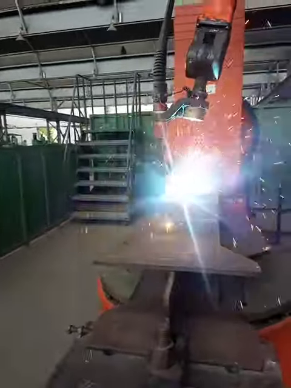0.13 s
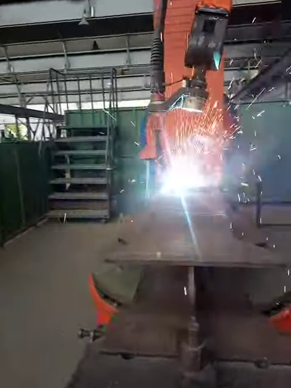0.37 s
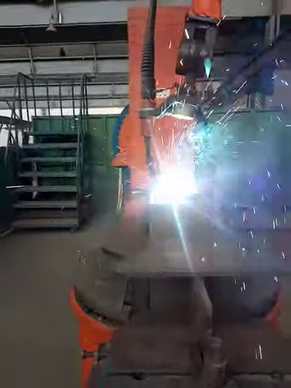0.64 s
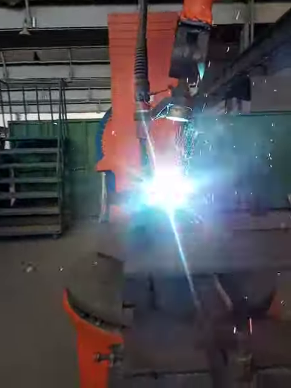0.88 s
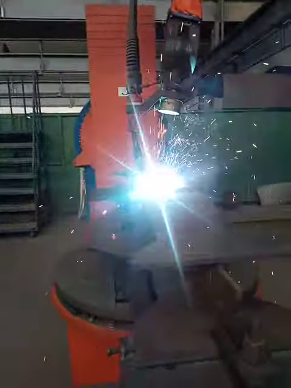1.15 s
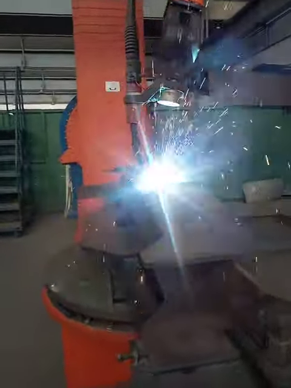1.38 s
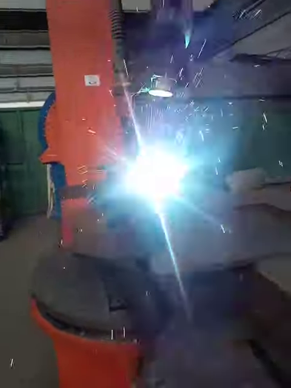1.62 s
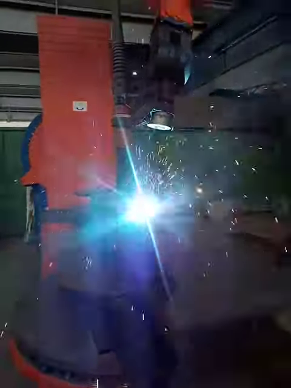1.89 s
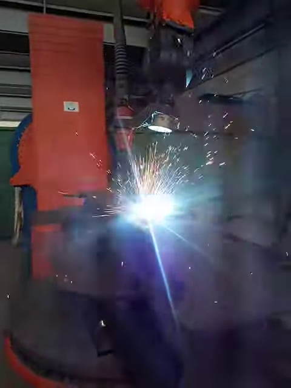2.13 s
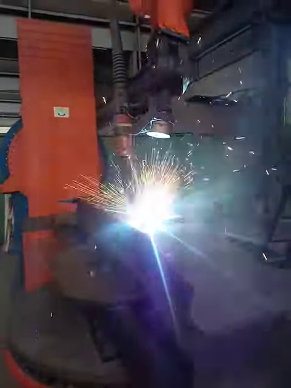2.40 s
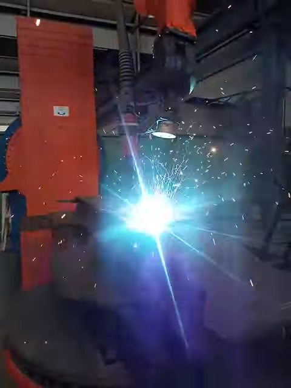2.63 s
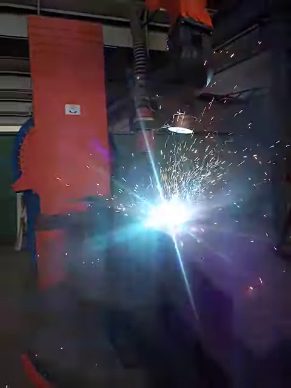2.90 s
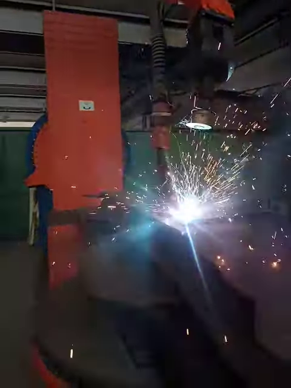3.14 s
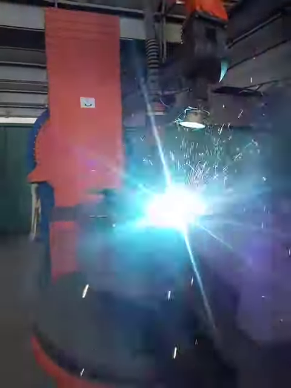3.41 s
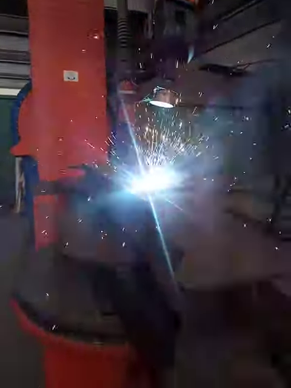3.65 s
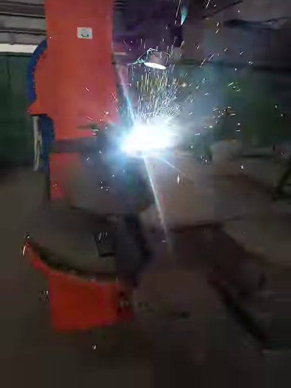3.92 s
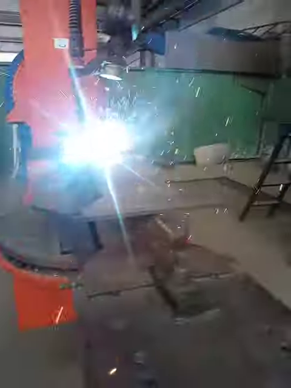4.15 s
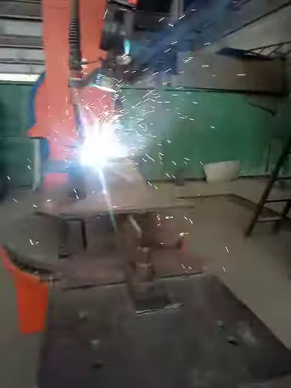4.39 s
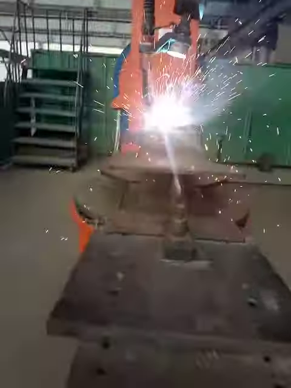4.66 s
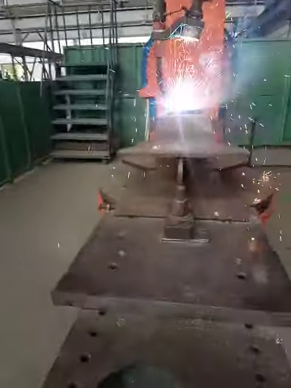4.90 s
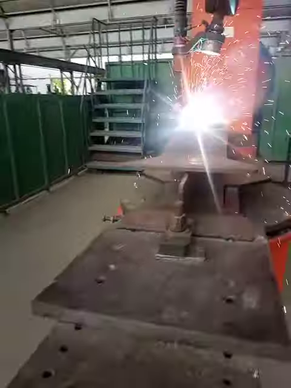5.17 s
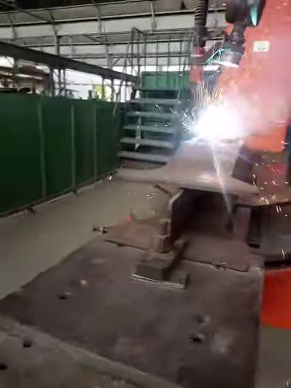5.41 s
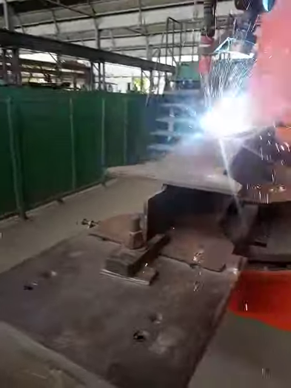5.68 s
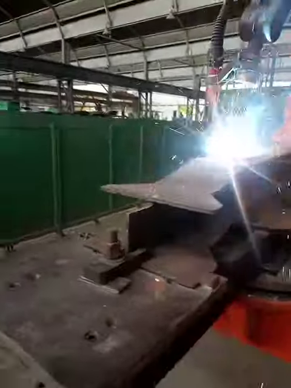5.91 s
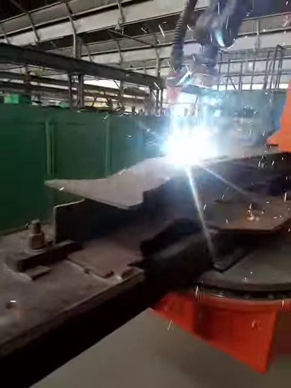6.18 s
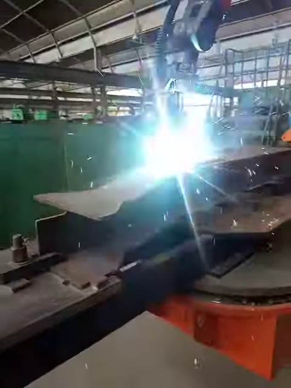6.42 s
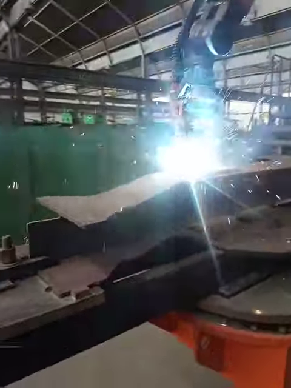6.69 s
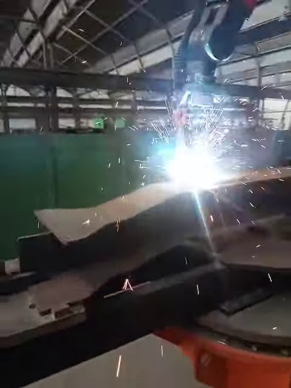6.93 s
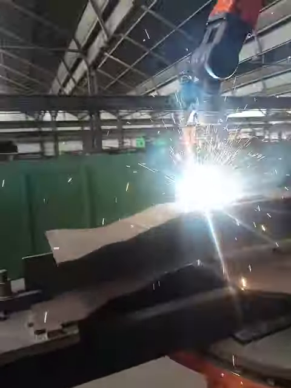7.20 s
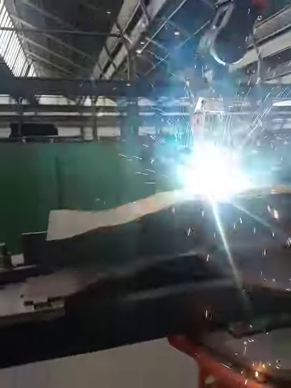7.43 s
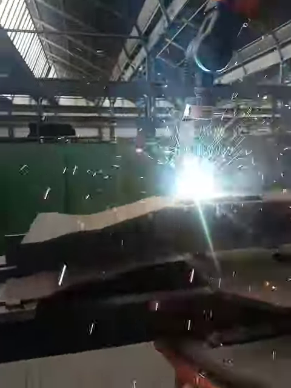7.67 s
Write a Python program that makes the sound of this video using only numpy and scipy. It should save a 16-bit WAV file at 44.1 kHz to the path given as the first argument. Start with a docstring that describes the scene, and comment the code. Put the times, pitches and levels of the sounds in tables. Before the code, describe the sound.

A wire-fed welding torch burns continuously on steel in a factory hall, heard through a handheld microphone moving around the work. From 0 s a bright, gritty hiss throbs very rapidly at about 250 pulses a second, with crisp irregular snaps roughly ten to twenty times a second. A faint buzzing hum and thin whine lie beneath, over low, soft machinery roar. From about 1.2 s the arc and hum gradually weaken, quietest around 2.2-3.5 s, where small dull microphone knocks accompany some crackles. Near 3.9-4.1 s it surges back, fuller and harsher, with louder pops. Between 4 and 6.8 s it is strongest, the hum and hall roar swelling around 5-6 s, with shifting metallic, hollow resonances and short reverberation. After 7 s it thins and falters, with one last knock near 7.7 s; the weld is still crackling when it stops at about 7.8 s.

```python
"""Pulsed-arc welding in a factory hall

A wire-fed torch welds steel while the listener walks round the work. Each current pulse modulates the arc:
harmonic tones give the hum, noise and random puffs the throbbing hiss, sharper puffs the snaps of droplets
that short the arc. Echoes, resonances and a diffuse tail place it in the hall, over a roar of filtered noise.
Now and then high-passed pressure steps give the hand-held microphone a dull knock."""
import sys
import numpy as np
from scipy import signal
from scipy.fft import rfft, irfft, next_fast_len
from scipy.io import wavfile
from scipy.ndimage import uniform_filter1d, map_coordinates

SR = 44100
rng = np.random.default_rng(int(sys.argv[2]) if len(sys.argv) > 2 else 0)


def to_wav(sig):
    """Store sig (one row per channel, or 1-D mono) as 16-bit WAV at the path in sys.argv[1].

    Samples outside -1..1 are clipped; the rate is SR.
    """
    pcm = np.clip(np.atleast_2d(sig), -1, 1) * 32767
    pcm = np.round(pcm).astype(np.int16)
    wavfile.write(sys.argv[1], SR, pcm.T)  # frames by channels


def invert_db(x):
    """Field ratio 10**(x/20) for x, a level in decibels (scalar or array-like)."""
    u = np.asarray(x, float) / 20
    return 10 ** u


N = 344421
PULSE_HZ = 248.05  # rate of the current pulses

# Pressure jolts on the microphone, each arriving with a short circuit: time_s, step_db
KNOCKS = [(2.275, -26.5), (2.3632, -29), (2.3703, -18.5), (2.4403, -20.5), (2.7588, -32), (2.7671, -30.5),
          (2.84, -30), (2.893, -19.5), (3.0732, -28.5), (3.1259, -19.5), (3.1704, -25.5), (3.3234, -23.5),
          (3.3803, -25), (3.445, -31.5), (3.5528, -24), (7.7152, -18.5)]


def rms_one(x):
    """Normalisation: scales the root mean square to 1."""
    return x / np.sqrt(np.mean(x ** 2) + 1e-20)


def in_time(rows):
    """Linear interpolation of each column over the scene; the first column is time in seconds."""
    s, *columns = np.transpose(rows)
    return [np.interp(np.arange(N) / SR, s, column) for column in columns]


def drift(rate_hz):
    """Low-pass random process of rms 1: noise twice through a one-pole filter."""
    r = np.exp(-2 * np.pi * rate_hz / SR)
    noise = rng.standard_normal(N + SR)
    settled = signal.lfilter([1], [1, -2 * r, r * r], noise)[SR:]
    return rms_one(settled)


def response(spectrum, size=4096):
    """Minimum phase: folding the cepstrum gives the most compact causal impulse response of a spectrum."""
    hz, db = np.transpose(spectrum)
    grid = np.maximum(np.arange(size // 2 + 1), 1) * SR / size
    gain = invert_db(np.interp(np.log(grid), np.log(hz), db))
    cepstrum = irfft(np.log(gain))
    cepstrum[1:size // 2] *= 2
    cepstrum[size // 2 + 1:] = 0
    return irfft(np.exp(rfft(cepstrum)))


def through(x, impulse):
    """Linear filtering: convolution with an impulse response."""
    return signal.fftconvolve(x, impulse)[:N]


def dying(t60_s):
    """Exponential decay from height 1 by 60 dB."""
    return invert_db(-60 * np.arange(round(t60_s * SR)) / (t60_s * SR))


def evened(x):
    """Slow gain control: divides by the running rms, the power averaged twice over a third of a second."""
    power = uniform_filter1d(uniform_filter1d(x ** 2, size=SR // 3), size=SR // 3)
    return x / np.sqrt(power + 1e-20)


def roar(hall_db):
    """Incoherent addition: far machines and extraction fans blend into low, filtered noise."""
    # Spectral shape of the hall machinery: frequency_hz, relative_db
    spectrum = [(25, -28), (50, -24), (90, 6.5), (180, 13), (300, 13), (420, 0.5), (700, 8.5), (1200, -0.5),
                (2500, -55.5)]
    wash = rms_one(through(rng.standard_normal(N), response(spectrum)))
    return invert_db(hall_db + 2.0 * drift(20.0)) * wash


def knocks(rise_hz=4000, cut_hz=85):
    """Step response: the microphone's bass cut turns a pressure step into a spike, a rebound and a dip."""
    jolts = np.full(N, 1e-18)  # a tiny floor against underflow in the filters
    for s, db in KNOCKS:
        jolts[round(s * SR) - 6] = -invert_db(db)
    steps = np.cumsum(jolts)
    soft = signal.sosfilt(signal.butter(2, rise_hz, fs=SR, output="sos"), steps)
    return signal.sosfilt(signal.butter(4, cut_hz, "high", fs=SR, output="sos"), soft)


def hum_db():
    """Interference: direct sound and reflection add or cancel, differently for each harmonic."""
    # Reflection met on the walk: time_s, extra_path_m, direct_hum_db
    wall = [(0.0, 0.28, -49), (0.15, 0.27, -47.5), (0.5, 0.3, -51.5), (0.8, 0.43, -53.5),
            (1.05, 0.5, -52.5), (1.3, 0.51, -56.0), (1.7, 0.14, -59.0), (2.2, 0.18, -59.5),
            (2.8, 0.17, -61.0), (3.3, 0.18, -61.5), (3.7, 0.2, -59), (3.95, 0.41, -55), (4.2, 0.41, -51.5),
            (4.5, 0.38, -55), (4.7, 0.38, -49.5), (5.2, 0.4, -47.0), (5.6, 0.34, -46.5), (6.0, 0.34, -48.0),
            (6.4, 0.31, -48.0), (6.8, 0.31, -50.5), (7.1, 0.32, -53.5), (7.5, 0.33, -51.5),
            (7.81, 0.31, -55.0)]
    # Harmonics 1, 2, 3 of the pulse rate against the direct hum: level_db
    harmonics = [1, 0.5, -2]
    reflected_share, sound_m_per_s = .7, 343
    path_m, direct_db = in_time(wall)
    turns = path_m * PULSE_HZ / sound_m_per_s  # extra path in wavelengths of the first harmonic
    levels = []
    for k, db in enumerate(harmonics, 1):
        pressure = np.abs(1 + reflected_share * np.exp(2j * np.pi * k * turns))
        levels.append(db + direct_db + 20 * np.log10(pressure))
    return levels


def tones(cycle, arc_db):
    """Periodic excitation: pulse-rate harmonics and higher tones, wavering in level and phase."""
    # Higher tones that follow the arc's strength: frequency_hz, level_against_arc_db
    whine = [(818, -30), (992, -30), (1092, -29), (1240, -26), (1488, -26), (1861.7, -24), (2120.5, -27),
             (2480.5, -27), (2728.6, -25), (2976.6, -22), (3472.7, -24)]
    low = [(k * PULSE_HZ, db) for k, db in enumerate(hum_db(), 1)]
    high = [(hz, arc_db + db) for hz, db in whine]
    out = np.zeros(N)
    for hz, db in low + high:
        ratio = hz / PULSE_HZ
        level = np.sqrt(2) * invert_db(db + 3.9 * drift(8.8))
        phase = 2 * np.pi * cycle * ratio + 0.24 * ratio * drift(0.381) + 6 * rng.random()
        out += level * np.sin(phase)
    return out


def puff(clicks, spit_share, thin_hz=1100, soft_hz=9000):
    """All-pass dispersion: a push of air swings out and back, trailed by a short spit of decaying noise."""
    swing_hz, swing_width_hz, spit_t60_s = 4500, 3300, .007
    r, w = np.exp(-np.pi * swing_width_hz / SR), 2 * np.pi * swing_hz / SR
    a = [1, -2 * r * np.cos(w), r * r]
    swing = signal.lfilter(a[::-1], a, clicks)
    spit = spit_share * through(clicks, dying(spit_t60_s)) * rng.standard_normal(N)
    band = signal.butter(1, [thin_hz, soft_hz], "band", fs=SR, output="sos")
    return signal.sosfilt(band, swing + spit)


def snaps(arc_db):
    """Impulsive sources: the loud short circuits as clicks, sized against the arc's strength at that moment."""
    # The loudest short circuits: time_s, peak_db
    loud_shorts = [(0.0204, -12), (0.0488, -11), (0.158, -11), (0.2458, -12), (0.2897, -13), (0.3147, -10),
                   (0.3346, -13), (0.3441, -13), (0.3835, -11), (0.411, -9), (0.4813, -11), (0.5322, -13),
                   (0.597, -11), (0.637, -14), (0.7462, -11), (0.8066, -14), (0.8545, -11), (0.9183, -15),
                   (0.9612, -15), (0.9961, -14), (1.0211, -12), (1.058, -11), (1.1653, -17), (1.1787, -8),
                   (1.2715, -16), (1.3284, -14), (1.3952, -16), (1.4277, -15), (1.492, -12), (1.5813, -13),
                   (1.6606, -15), (1.8188, -13), (1.9639, -17), (1.9924, -16), (2.0762, -16), (2.15, -15),
                   (2.2618, -14), (2.3077, -18), (2.362, -16), (2.4119, -22), (2.4309, -18), (2.5167, -14),
                   (2.5386, -17), (2.576, -16), (2.6179, -13), (2.7511, -18), (2.7576, -15), (2.8389, -16),
                   (2.8744, -14), (2.9148, -16), (2.9352, -14), (2.9956, -17), (3.028, -14), (3.1004, -16),
                   (3.1243, -16), (3.1986, -19), (3.2176, -18), (3.245, -17), (3.2894, -17), (3.3218, -14),
                   (3.4605, -15), (3.5523, -13), (3.6162, -15), (3.7434, -15), (3.7818, -14), (3.8302, -15),
                   (3.8746, -13), (3.8886, -12), (3.9489, -12), (3.9799, -10), (4.0083, -12), (4.2218, -11),
                   (4.2632, -10), (4.3121, -13), (4.3635, -10), (4.3844, -8), (4.5446, -12), (4.5865, -13),
                   (4.6279, -12), (4.8189, -12), (4.8549, -12), (4.9681, -10), (5.009, -12), (5.0345, -10),
                   (5.1267, -13), (5.3712, -11), (5.4201, -9), (5.4375, -11), (5.4655, -9), (5.6151, -10),
                   (5.6955, -12), (5.7034, -8), (5.8037, -10), (5.8287, -10), (5.908, -11), (6.0656, -12),
                   (6.0851, -13), (6.134, -13), (6.1699, -11), (6.328, -8), (6.3869, -11), (6.4173, -12),
                   (6.4363, -11), (6.4607, -13), (6.4767, -11), (6.5211, -11), (6.5635, -12), (6.5854, -14),
                   (6.6448, -13), (6.6827, -15), (6.7181, -14), (6.8119, -16), (6.9087, -11), (6.9491, -13),
                   (6.9935, -12), (7.016, -16), (7.0569, -17), (7.0843, -16), (7.1302, -16), (7.1911, -15),
                   (7.214, -14), (7.235, -12), (7.2868, -13), (7.4121, -16), (7.4604, -19), (7.4799, -16),
                   (7.5133, -15), (7.5572, -14), (7.6056, -15), (7.6585, -15), (7.7513, -20), (7.7747, -19)]
    rise_s, knock_snap_db = .0013, -17
    loss_db = 2.5  # makes up for what a peak loses in the puff and the microphone colour
    events = [(s + rise_s, db) for s, db in loud_shorts] + [(s, knock_snap_db) for s, _ in KNOCKS]
    s, peak_db = np.transpose(events)
    at = np.round(s * SR).astype(int) - 14
    out = np.zeros(N)
    out[at] = invert_db(peak_db + loss_db - arc_db[at])
    return out


def shorts(loud):
    """Extinction and re-ignition: a snap, a brief hush, then a brighter tick; gives (hush gain, ticks)."""
    hush_from_s, hush_to_s, hush_depth_db = .003, .0105, -4
    restrike_delays_s, restrike_db = (.0116, .0133), -7
    window = np.zeros(round(hush_to_s * SR))
    window[round(hush_from_s * SR):] = 1
    hushed = np.minimum(through(1.0 * (loud > 0), window), 1)
    hush = invert_db(hush_depth_db * uniform_filter1d(hushed, size=SR // 700))
    at, again = np.flatnonzero(loud), np.zeros(N + SR)
    delay = (rng.choice(restrike_delays_s, len(at)) * SR).astype(int)
    again[at + delay] = loud[at] * invert_db(restrike_db + rng.normal(0, 1.7, len(at)))
    first = puff(loud, .24, thin_hz=710, soft_hz=10900)
    second = puff(again[:N], .15, thin_hz=4000, soft_hz=18000)
    return hush, first + second


def sizzle(cycle, loud, per_s, spread_db, bed_db, throb):
    """Modulated random process: the rate of small shorts and the power of the hiss throb with the current."""
    timing = 1 + throb * (np.cos(2 * np.pi * cycle) + .8 * np.cos(4 * np.pi * cycle + 0.5))
    surge_db = -0.34 * drift(34) + 0.5294 * drift(29) + 0.9 * drift(155)  # strength wanders quickly
    born = rng.random(N) < per_s * np.clip(timing, 0, None) ** 2 / SR
    sizes = invert_db(spread_db * np.minimum(rng.exponential(1, N), 2))
    pops = puff(born * sizes, .15)
    bed = invert_db(bed_db) * np.sqrt(np.clip(timing, .05, None)) * rng.standard_normal(N)
    hush, ticks = shorts(loud)
    return rms_one(invert_db(surge_db) * hush * (bed + pops)) + ticks


def microphone_colour(x):
    """Linear frequency response: the arc's spectrum as heard through the microphone."""
    # Colour of the arc: frequency_hz, relative_db
    colour = [(25, -32), (150, -15), (400, -9), (1100, -10), (1900, -3.5), (2600, -5.5), (3400, -2),
              (4000, -2.5), (5100, 1), (5750, 0), (6150, 2), (6600, 6.5), (7400, 2), (9700, -7.5)]
    # Its continuation at the top of the treble: frequency_hz, relative_db
    top = [(13850, -13.5), (14600, -4), (15700, -3), (15900, -40)]
    return through(x, response(colour + top))


def echoes(x):
    """Comb filtering: delayed copies, dull in the treble, add a twin, the plate's echo and three weaker ones."""
    # A close twin of each pulse off the microphone's own case: time_s, share_of_direct
    twin_rows = [(0, .5), (1.5, .45), (3.5, .35), (4.2, .3), (6.5, .25), (7.81, .35)]
    # Reflection off the steel plate on the walk: time_s, lag_ms, share_of_direct
    plate = [(0, 0.99, 0.037), (.6, 1.4, 0.056), (1.3, 2.6, 0.04), (2.1, 3.4, 0.044), (3.3, 1.8, 0.0888),
             (4.2, 1.48, 0.11), (5.0, 1.14, 0.15), (5.6, 1.6, 0.041), (6.5, 1.4, 0.099), (6.9, 1.2, 0.078),
             (7.81, 1.3, 0.12)]
    twin_share, = in_time(twin_rows)
    plate_ms, plate_share = in_time(plate)
    paths = [(.222, twin_share), (plate_ms, plate_share)]
    for ms in (.8, 2.3, 3.9):  # nearby steel, its lags slowly wandering
        paths.append((ms * (1 + 0.097 * drift(0.503)), .1))
    dull = signal.sosfilt(signal.butter(2, 8500, fs=SR, output="sos"), x)
    n = np.arange(N)
    return x + sum(share * map_coordinates(dull, [n - ms * SR / 1000], order=3) for ms, share in paths)


def hollows(x):
    """Resonance: narrow bands stand out, each swelling and fading while a hollow of the work faces the listener."""
    # Resonances, the two ends of a stretch in either order: one_end_s, other_end_s, centre_hz, width_hz, share
    resonances = [(0, 3.6, 5830, 400, .5), (0, 1.3, 6650, 300, 0.59), (.75, 1.4, 5100, 300, 0.35),
                  (1.398, 2, 3430, 245, 0.35), (3.5, 3.8, 4950, 250, 0.3785), (3.7, 4.58, 5400, 250, 0.59),
                  (3.9, 9, 3480, 180, 0.6), (5.3, 5.4, 3170, 250, 0.5), (6.0, 5.98, 4300, 250, 0.53),
                  (6.45, 7.15, 4850, 294, 0.62), (5.6, 16, 6640, 350, 0.83), (6.801, 4.3, 5860, 308, 0.13),
                  (5.9, 6.655, 5250, 300, 0.55), (6.1, 6.98, 3960, 200, 0.73)]
    out, s = x.copy(), np.arange(N) / SR
    for start, end, hz, width_hz, share in resonances:
        r = np.exp(-np.pi * width_hz / SR)
        poles = [1, -2 * r * np.cos(2 * np.pi * hz / SR), r * r]
        rung = signal.lfilter([(1 - r * r) / 2, 0, (r * r - 1) / 2], poles, x)
        swell = np.sin(np.pi * np.clip((s - start) / (end - start), 0, 1))
        out += share * swell * rung
    return out


def hall(x):
    """Diffuse reverberation: a decaying, duller noise tail, a new one crossfaded in every half second."""
    t60_s, tail_db = 0.18, -8.5
    step, size = SR // 2, round(t60_s * SR)
    out = np.zeros(N + 4 * SR)
    padded = np.concatenate([np.zeros(step), x, np.zeros(2 * step)])
    for i in range(0, N + step, step):
        noise = rng.standard_normal(size)
        tail = signal.lfilter([1], [1, -.3], dying(t60_s) * noise)
        tail /= np.sqrt(np.sum(tail ** 2))
        wet = signal.fftconvolve(padded[i:i + 2 * step] * np.hanning(2 * step), tail)
        out[i:i + len(wet)] += wet
    return x + invert_db(tail_db) * out[step:step + N]


def shaded(x, arc_db, pointing_db, hall_db):
    """Band-wise modulation: soft-edged bands follow arc, pointing and hall in their own measure, and flicker."""
    # Borders between the bands: frequency_hz
    edges = [1500, 3000, 6000, 9000, 14100]
    # Bands, low to high: level_against_3_to_6_khz_db, slow_arc_share, quick_flare_share, pointing_share,
    # hall_swing_share, flicker_db (scales a sum of three drifts brought to rms 1)
    shares = [(-11.5, 0.32, 0.71, -0.048, 0.54, 1.53), (-7, 0.59, 0.85, -0.47, 0.32, 0.26),
              (0, 1, 1, 0, 0, .4), (-2, 0.46, 0.49, -0.68, -0.058, 0.68),
              (-10, 0.17, .45, -0.07, 0.025, -0.2), (-6, 0.41, 0.4, 0.41, -0.1, 2.1)]
    size = next_fast_len(N)
    spectrum = rfft(x, size)
    octave = np.log2(np.maximum(np.arange(size // 2 + 1), 1) * SR / size)
    above = [1, *[1 / (1 + np.exp((np.log2(hz) - octave) / .03)) for hz in edges], 0]
    mean_db, together = arc_db.mean(), drift(7.9)  # one drift is common to all bands
    slow_db = uniform_filter1d(arc_db, size=SR // 2)
    out = np.zeros(N)
    for (db, follows, flares, aim, wash, flicker_db), a, b in zip(shares, above, above[1:]):
        band = evened(irfft(spectrum * (a - b), size)[:N])
        level_db = mean_db + db + follows * (slow_db - mean_db) + flares * (arc_db - slow_db)
        level_db = level_db + aim * pointing_db + wash * (hall_db - hall_db.mean())
        flicker = rms_one(1.4 * together + 0.86 * drift(6.73) + drift(62))
        out += invert_db(level_db + flicker_db * flicker) * band
    return out


def scene():
    """Superposition: the arc, its tones, the hall's roar and the knocks add as pressures."""
    # The arc flares and falters, as rms of its 3-6 kHz band: time_s, strength_db
    arc_rows = [(0.0, -30.5), (0.1, -26.5), (0.2, -31.5), (0.24, -30.0), (0.27, -31.0), (0.4, -28.5),
                (0.44, -32.5), (0.48, -31.0), (0.62, -31.5), (0.69, -29.5), (0.78, -34.5), (0.86, -30.0),
                (0.95, -31.5), (1.06, -27.5), (1.15, -31.0), (1.19, -29.0), (1.25, -33.5), (1.34, -31.0),
                (1.43, -32.5), (1.53, -30.5), (1.55, -33.0), (1.58, -30.0), (1.67, -33.0), (1.81, -30.5),
                (1.85, -33.5), (1.95, -34.5), (2.0, -32.0), (2.06, -34.5), (2.17, -31.5), (2.23, -34.5),
                (2.27, -34.0), (2.41, -36.5), (2.44, -34.5), (2.49, -36.5), (2.63, -30.0), (2.73, -35.0),
                (2.77, -32.5), (2.85, -36.0), (2.9, -32.5), (3.1, -36.5), (3.16, -33.5), (3.23, -35.0),
                (3.39, -33.0), (3.46, -35.5), (3.52, -30.5), (3.58, -34.5), (3.62, -30.5), (3.72, -31.0),
                (3.75, -29.5), (3.83, -33.0), (3.9, -29.5), (4.08, -24.0), (4.15, -29.5), (4.24, -26.5),
                (4.32, -29.0), (4.38, -25.5), (4.42, -28.5), (4.48, -26.5), (4.57, -30.0), (4.67, -27.0),
                (4.92, -29.5), (5.04, -25.5), (5.26, -29.0), (5.44, -26.0), (5.5, -27.5), (5.65, -27.0),
                (5.67, -28.5), (5.71, -24.5), (5.82, -28.5), (5.86, -27.0), (6.12, -28.5), (6.25, -27.0),
                (6.37, -27.5), (6.4, -25.5), (6.45, -28.5), (6.5, -26.0), (6.71, -29.0), (6.77, -26.0),
                (6.81, -31.0), (6.87, -26.5), (7.07, -31.5), (7.09, -31.0), (7.25, -30.5), (7.4, -35.0),
                (7.42, -33.0), (7.46, -34.5), (7.52, -30.0), (7.63, -34.0), (7.67, -30.5), (7.71, -37.5),
                (7.75, -39.0), (7.81, -33.5)]
    # The microphone points at the arc and away, shared out band by band: time_s, pointing_db
    walk = [(0.0, -2.5), (0.45, -3), (1.08, -1.5), (1.3, 0.5), (1.6, 2), (2.1, 2), (2.8, 2), (3.2, -0.5),
            (3.85, 3.5), (4.07, 1), (4.3, 4), (4.7, -0.5), (5.6, 1.5), (6.1, -2), (6.5, 1), (7.1, 2),
            (7.4, -2), (7.81, 2.5)]
    # Hall wash: time_s, level_db
    hall_rows = [(0.0, -48), (0.41, -50), (0.69, -52.5), (1.04, -48), (2.0, -53), (2.36, -52.5),
                 (2.66, -51), (3.17, -51), (3.8, -50.5), (4.07, -47), (5.2, -42.5), (6.47, -43),
                 (7.05, -47), (7.81, -47.5)]
    (arc_db,), (pointing_db,), (hall_db,) = in_time(arc_rows), in_time(walk), in_time(hall_rows)
    cycle = np.arange(N) * PULSE_HZ / SR
    pushes = sizzle(cycle, snaps(arc_db), per_s=280, spread_db=0.5, bed_db=-17.5, throb=.2)
    arc = hall(hollows(echoes(microphone_colour(pushes))))
    arc = shaded(arc, arc_db, pointing_db, hall_db)
    hum = tones(cycle, uniform_filter1d(arc_db, size=SR // 3))
    return (arc + hum + roar(hall_db) + knocks())[None]


def band_limit(x):
    """A steep low-pass at the top of the band."""
    return signal.sosfilt(signal.butter(12, 17100, fs=SR, output="sos"), x)


def record(dry):
    """Band limiting: the recorder trims the deepest bass and the very top."""
    x = signal.sosfilt(signal.butter(1, 30, "high", fs=SR, output="sos"), dry)
    x = signal.sosfilt(signal.ellip(12, .5, 80, 15720, fs=SR, output="sos"), x)
    return band_limit(x)


dry = scene()
out = record(dry)
to_wav(out)
```